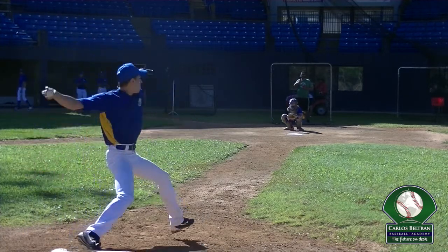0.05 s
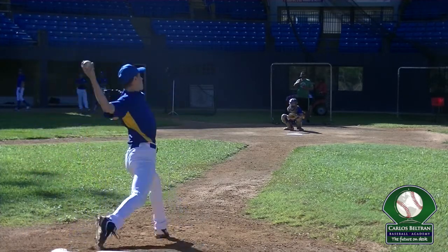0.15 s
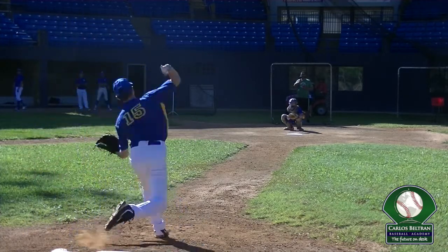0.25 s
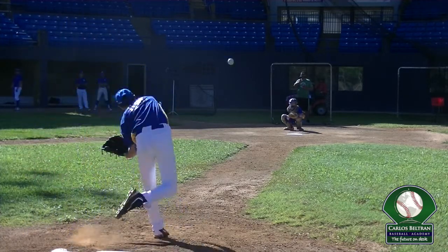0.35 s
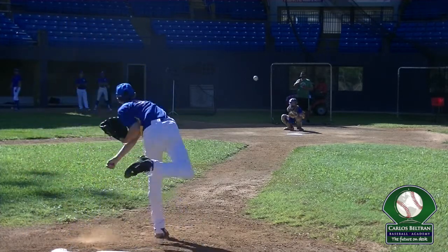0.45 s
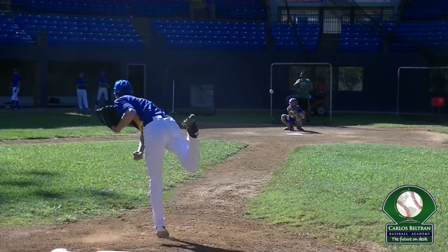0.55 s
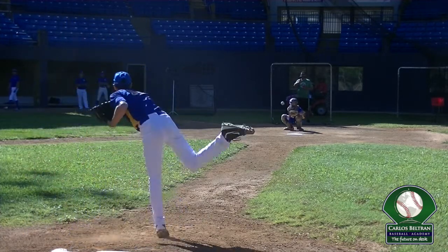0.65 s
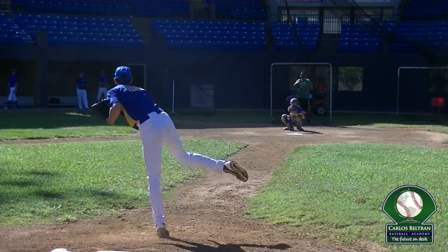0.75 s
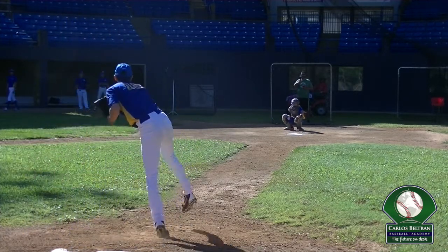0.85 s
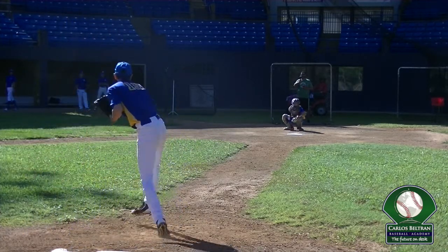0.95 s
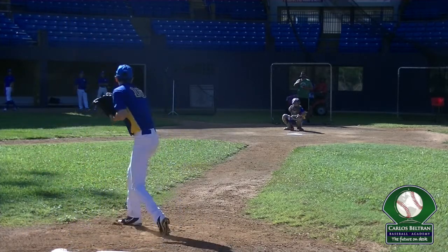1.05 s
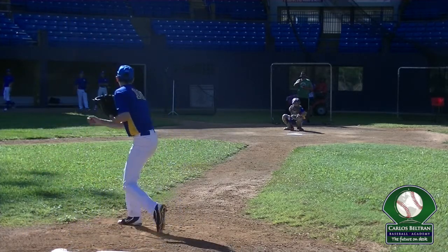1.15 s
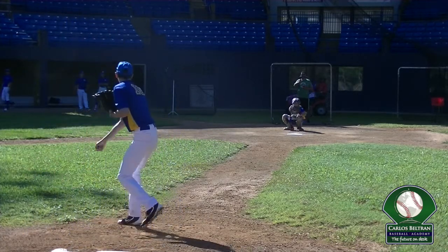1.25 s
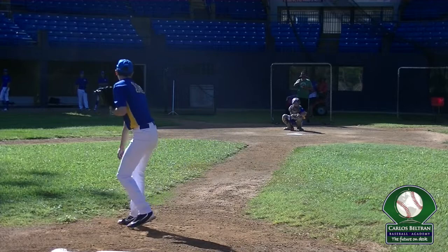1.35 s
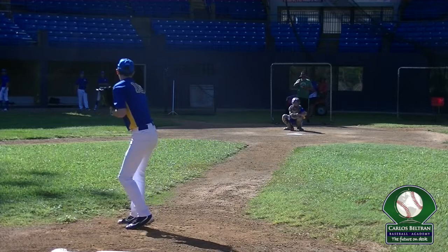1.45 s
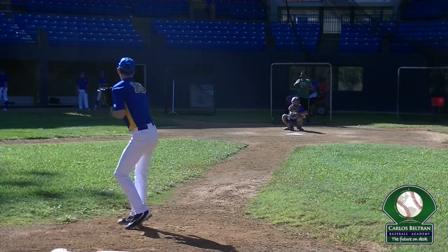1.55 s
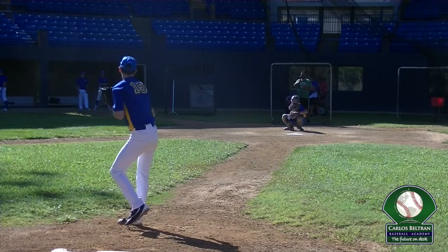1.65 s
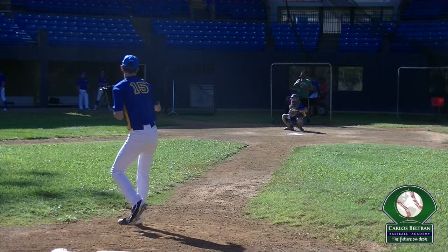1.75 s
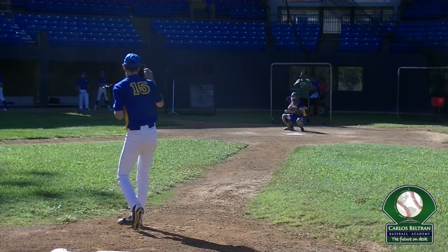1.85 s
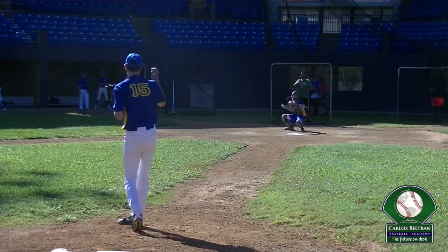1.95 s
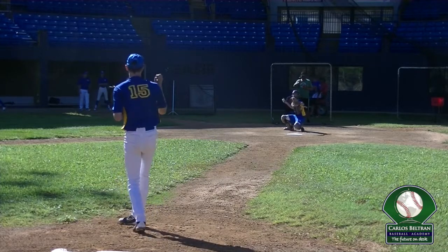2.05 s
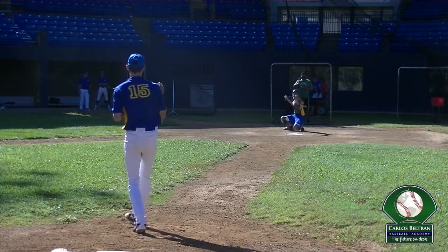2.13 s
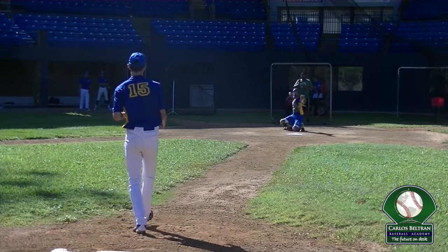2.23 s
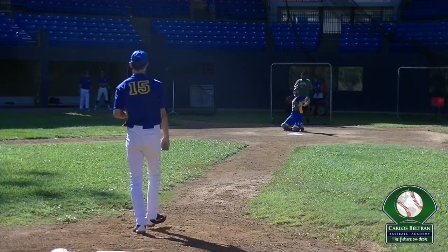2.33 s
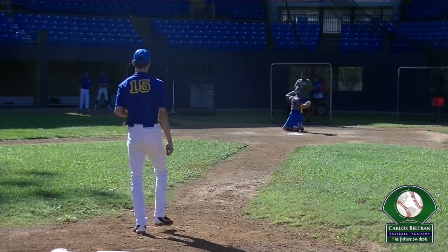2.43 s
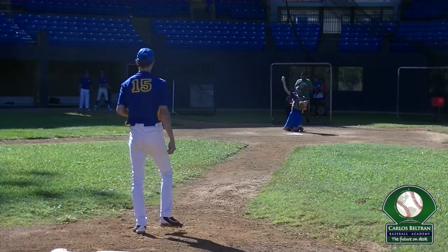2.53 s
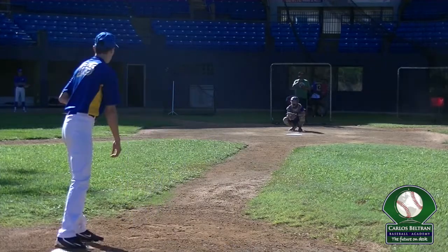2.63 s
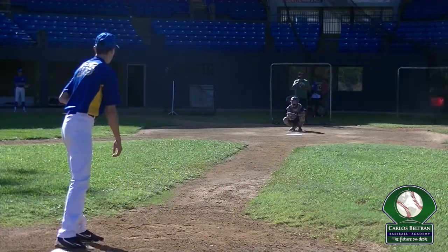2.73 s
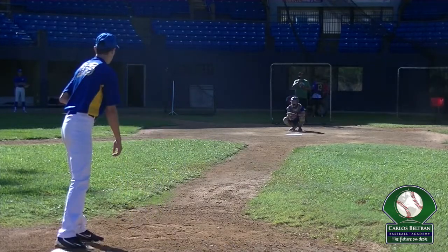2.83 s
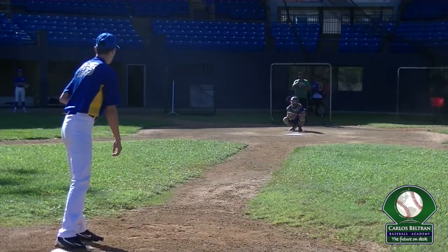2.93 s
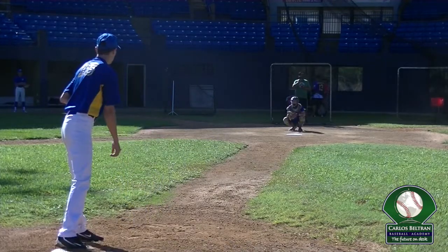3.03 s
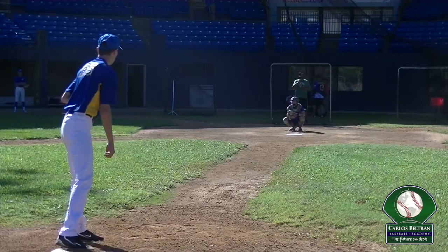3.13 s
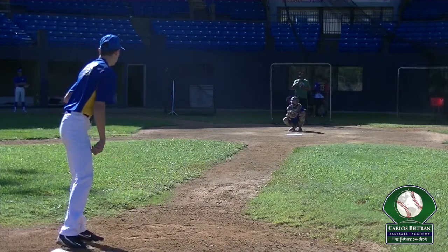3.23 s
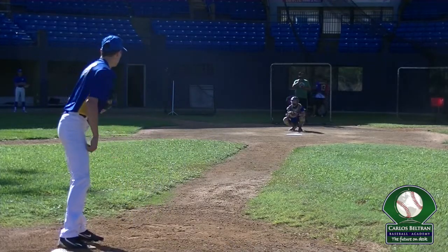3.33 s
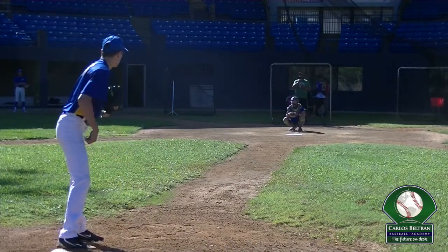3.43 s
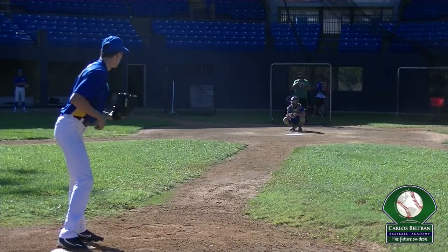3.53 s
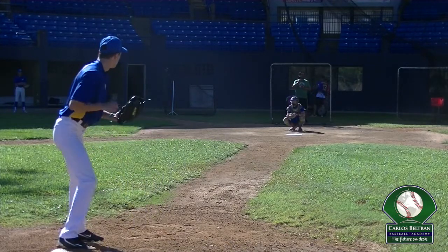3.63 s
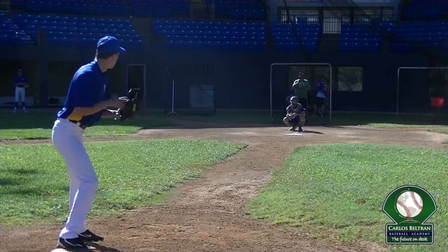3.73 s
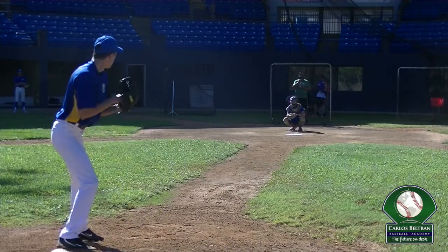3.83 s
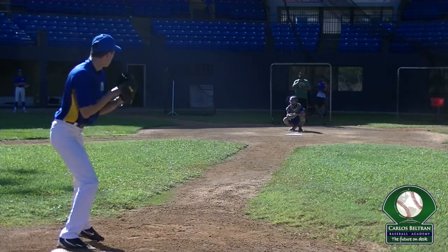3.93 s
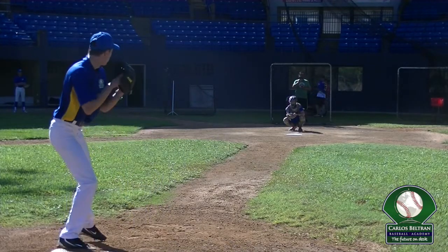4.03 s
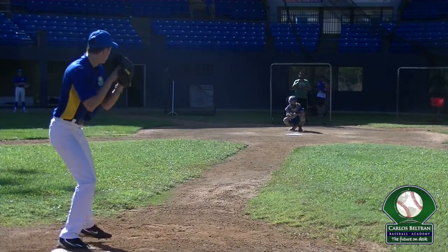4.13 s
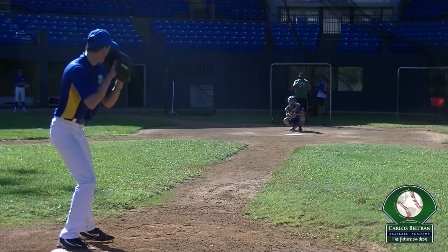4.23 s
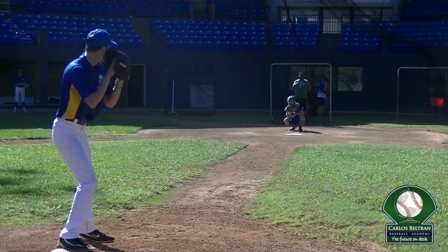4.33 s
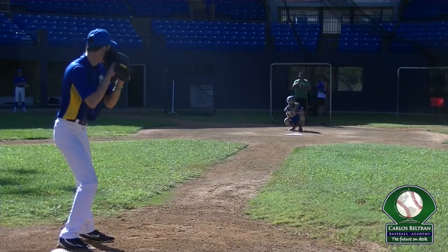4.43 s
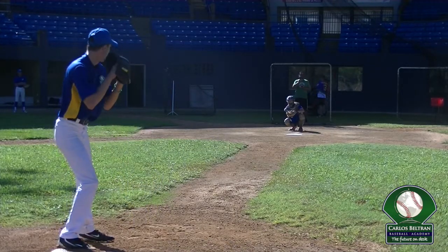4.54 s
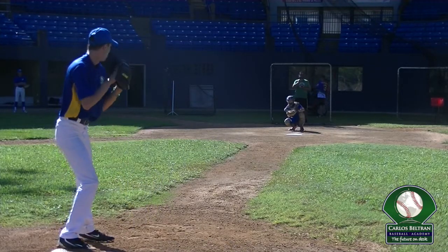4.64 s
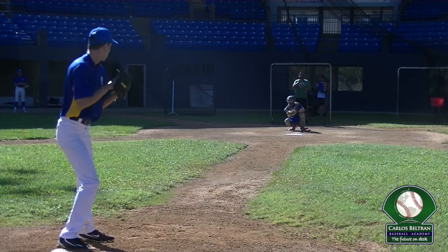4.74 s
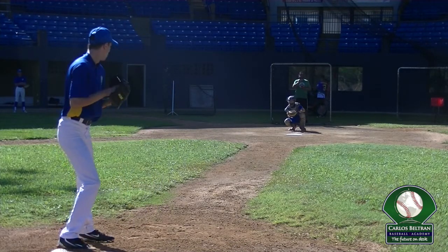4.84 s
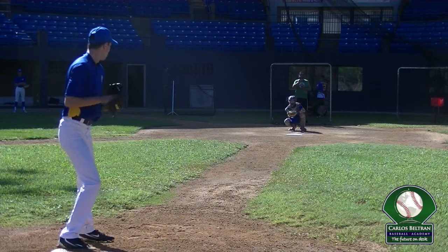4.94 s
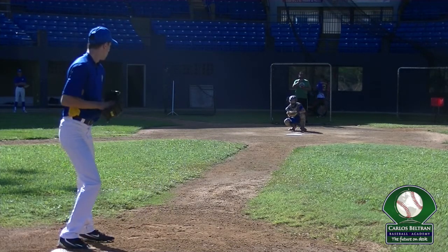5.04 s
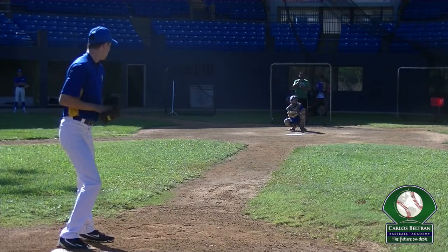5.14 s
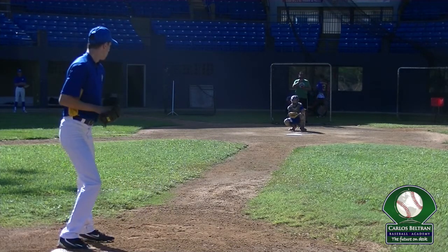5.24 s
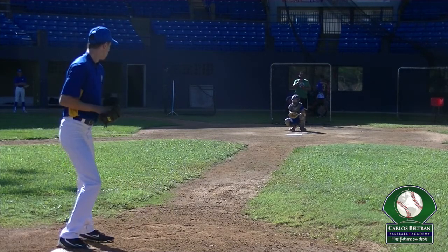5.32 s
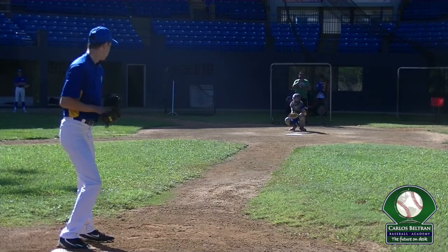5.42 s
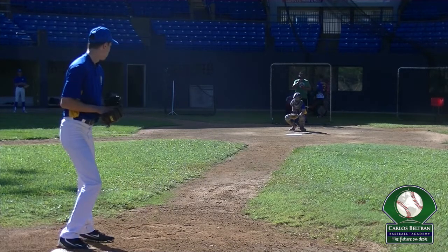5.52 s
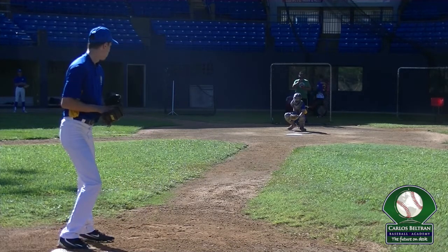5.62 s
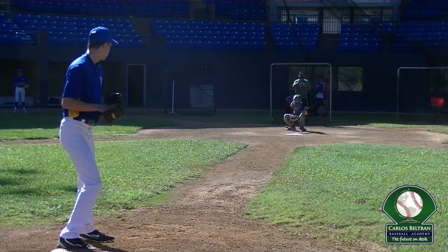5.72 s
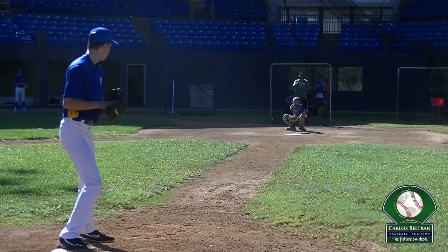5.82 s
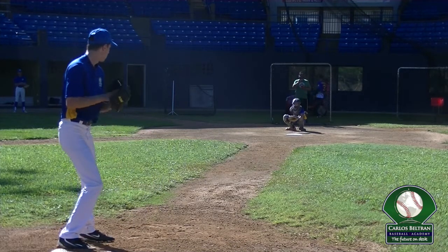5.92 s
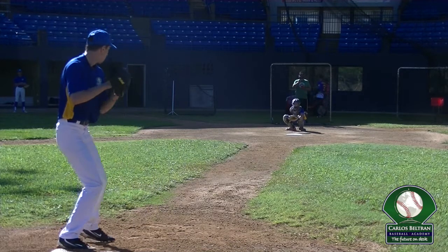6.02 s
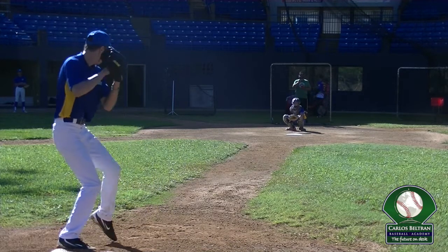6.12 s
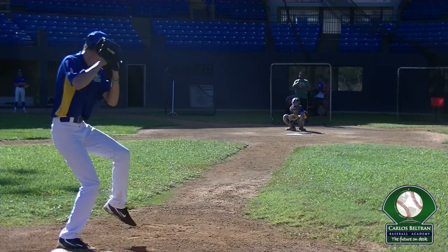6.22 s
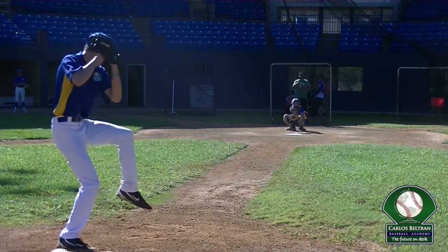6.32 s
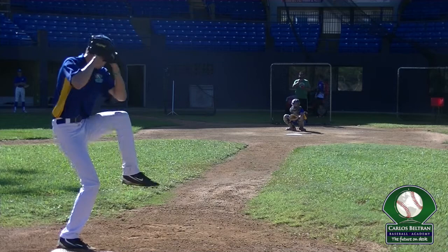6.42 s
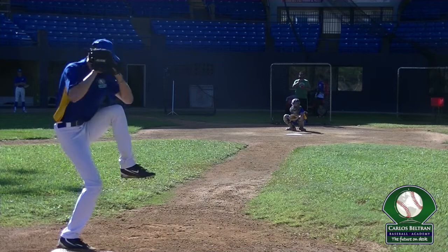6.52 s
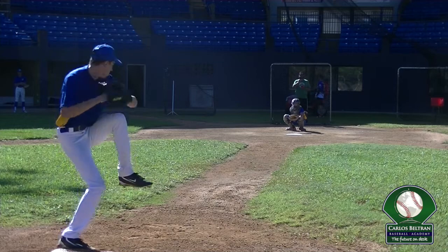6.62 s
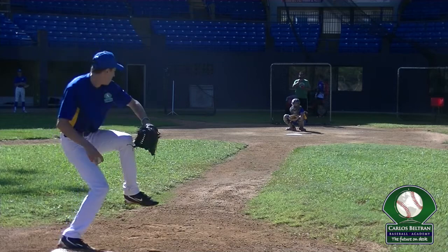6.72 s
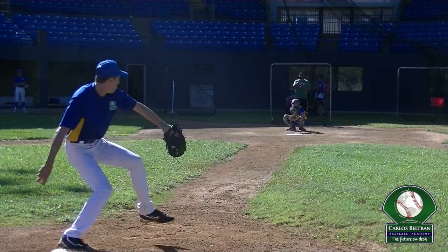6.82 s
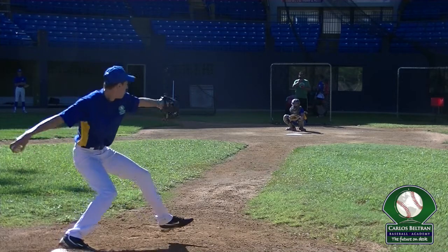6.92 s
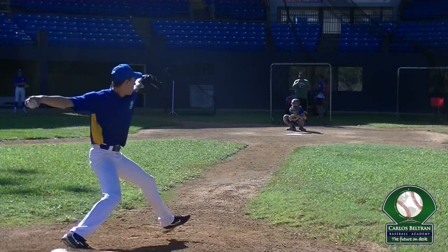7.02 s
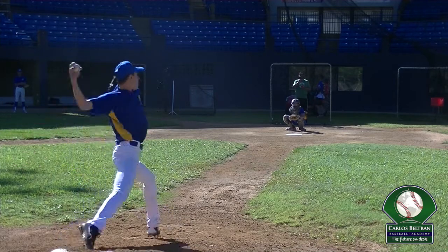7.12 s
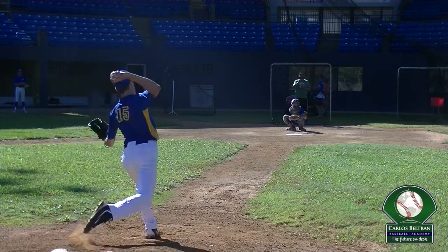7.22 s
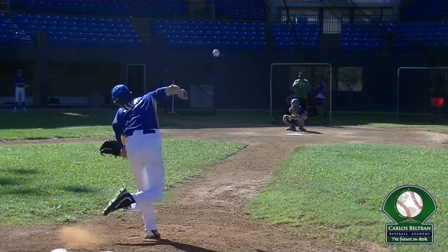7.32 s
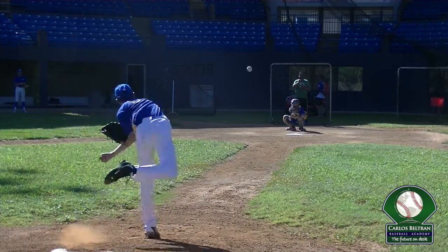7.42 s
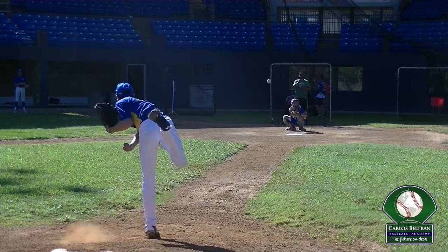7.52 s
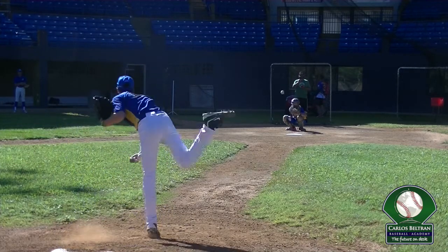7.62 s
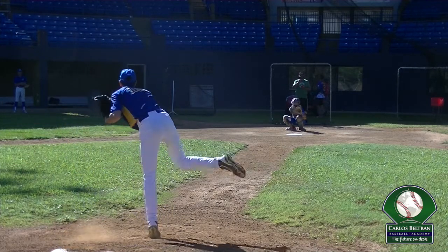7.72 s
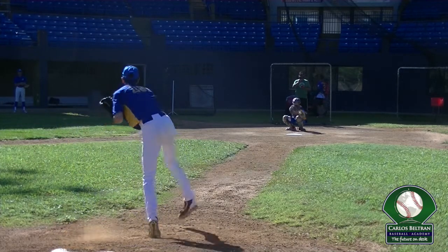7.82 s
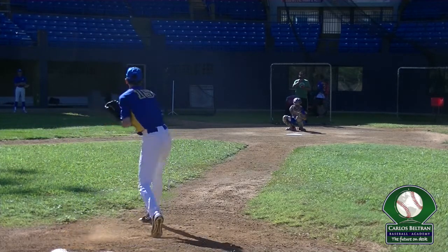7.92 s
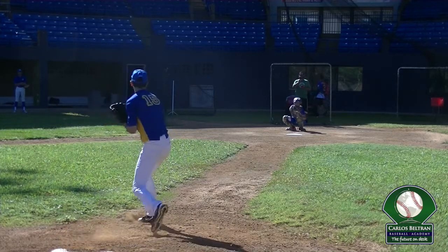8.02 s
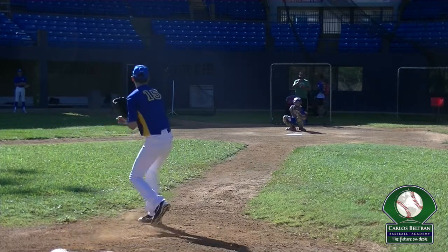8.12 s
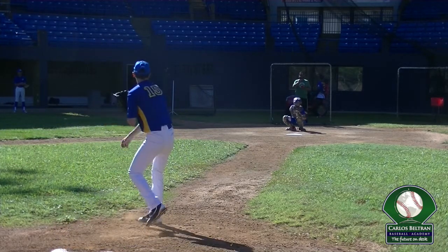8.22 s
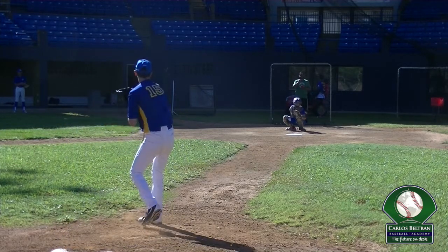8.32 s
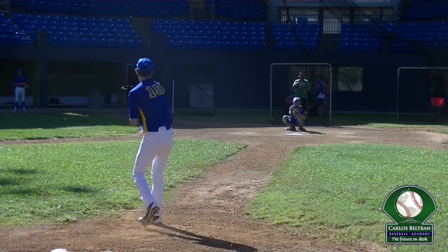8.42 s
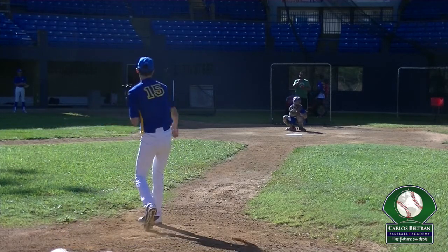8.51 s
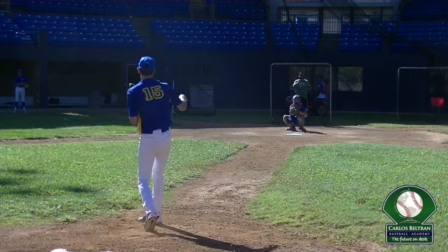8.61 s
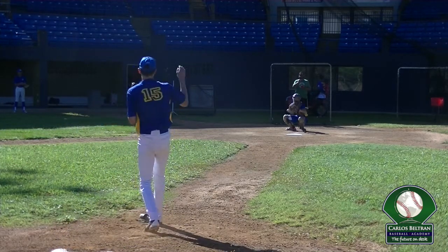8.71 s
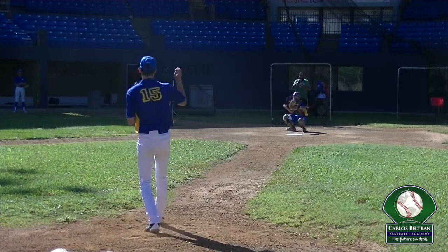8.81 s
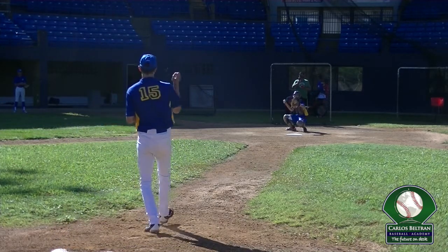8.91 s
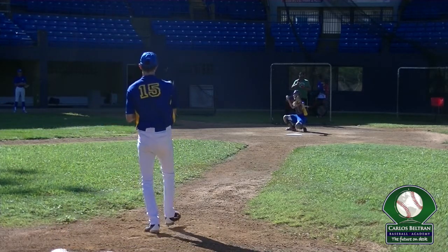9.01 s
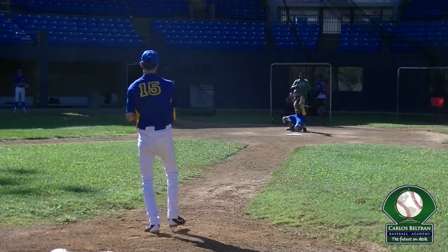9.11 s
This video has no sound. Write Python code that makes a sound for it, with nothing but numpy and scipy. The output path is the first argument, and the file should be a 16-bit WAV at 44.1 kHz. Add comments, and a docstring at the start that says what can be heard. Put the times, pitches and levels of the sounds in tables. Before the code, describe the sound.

Outdoor hush with far traffic, two sharp ball-in-glove pops with slapback echo, buzzy sparrow trills between them, and wind thudding the microphone near the end.

```python
"""A baseball cracks into a leather mitt twice: ringing leather modes over a thump of air in the pocket.
Empty stands throw each crack back as wall echoes and a wash from the seats, both shaped from noise.
Distant traffic and air are random spectra with a faint tone; wind thuds on the microphone as filtered eddies.
Shoes scrape dirt as dense noise grains; sparrows buzz and trill as tones on fast pitch curves.
A gain control ducks after loud peaks."""
import sys
import numpy as np
from scipy import signal
from scipy.fft import rfft
from scipy.io import wavfile
from scipy.ndimage import uniform_filter1d

SR = 44100
rng = np.random.default_rng(int(sys.argv[2]) if len(sys.argv) > 2 else 0)


def put_to_file(sound):
    """Save the sound as 16-bit audio at rate SR, in the file named by the first command-line argument."""
    columns = np.atleast_2d(sound).T  # one column per channel
    safe = np.clip(columns, -1, 1)
    whole_steps = np.round(safe * 32767)
    wavfile.write(sys.argv[1], SR, whole_steps.astype(np.int16))


N = 404000  # length in samples

# Colour of traffic and air: f/Hz, relative level/dB per Hz
AIR_COLOUR = [(25, -59), (105, -27.5), (165, -11.5), (230, -13), (335, -13), (395, -3.5), (450, -4.5),
              (750, -2), (1050, -7.5), (1500, -9.5), (1960, -8.5), (2180, -14.5), (3200, -15), (7000, -31),
              (16000, -43.5)]
# Loudness of traffic and air: t/s, level/dB from 400 to 2500 Hz
AIR_LEVEL = [(0.0, -43), (.95, -43), (1.17, -41.5), (1.5, -42.8), (2.3, -43), (2.93, -41), (7.0, -41.2),
             (7.73, -42.8), (8.85, -42), (9.16, -43.5)]
# Stereo likeness of the air: f/Hz, left-right correlation
AIR_LIKENESS = [(60, 0.64), (150, 0.92), (380, 0.96), (950, 0.87), (2380, 0.73), (5980, 0.31),
                (15000, 0.039)]
# Stereo lean of the air: f/Hz, left minus right/dB
AIR_LEAN = [(60, 2.0), (180, 2.5), (550, 3.3), (1650, 4.6), (4970, 1.4), (15000, 0.82)]
# Faint tone far off, before panning: t/s, level/dB
WHINE_LEVEL = [(0, -59), (2.3, -59), (2.4, -90)]
# Wind strength in three stretches, before the channel gains: t/s, level/dB from 90 to 400 Hz
GUSTS = [
    [(0, -64), (.13, -66), (.17, -46), (.52, -60), (.62, -76), (.74, -55), (.82, -64), (.94, -54)],
    [(1.1, -64), (1.3, -59), (1.48, -50), (1.65, -50), (1.71, -64), (1.87, -58), (2.1, -73)],
    [(6.3, -72), (6.6, -61), (6.8, -71), (6.96, -56), (7.2, -61), (7.32, -51), (7.6, -60), (7.82, -57),
     (7.87, -43), (7.945, -47), (8.0, -48), (8.06, -34), (8.12, -58), (8.42, -48), (8.46, -41), (8.53, -38),
     (8.59, -46), (8.63, -35), (8.66, -42), (8.78, -34), (8.8, -44), (8.86, -38), (8.95, -45), (8.97, -35),
     (9.04, -32), (9.16, -55)],
]
# Colour of wind on the microphone: f/Hz, relative level/dB per Hz
BUFFET_COLOUR = [(15, -82), (25, -43), (115, -7.5), (234, 0.5), (450, -6), (743, -15.5), (1840, -69),
                 (2020, -43), (2500, -55), (3250, -74), (5500, -120)]
# Hardest single eddies, before the channel gains: t/s, peak level/dB
THUDS = [(.076, -40), (0.359, -45), (0.75, -45), (1.355, -41), (1.469, -47), (1.864, -40), (7.867, -34),
         (8.046, -30), (8.241, -37), (8.455, -24), (8.466, -24), (8.503, -23.5), (8.62, -28),
         (8.686, -20.5), (8.726, -24), (8.781, -20.5), (8.8165, -20.5), (8.837, -23), (8.861, -22.5),
         (8.966, -25.5), (9.003, -37), (9.034, -22.5), (9.048, -30), (9.068, -40)]
# The back shoe drags, then the steps land: peak t/s, level/dB from 6.08 to 7.46 kHz,
# swell t/s per 20 dB, fade t/s per 20 dB
SCRAPES = [(.225, -59, .14, .05), (.26, -52, .06, .03), (.382, -58.5, .04, .2), (.6, -68, .5, .8),
           (7.2, -58, .025, .07), (7.25, -54, .12, .018), (7.38, -57, .025, .04), (7.43, -69, .05, .6),
           (7.65, -68, .06, .5)]
# Colour of dirt under the shoes: f/Hz, relative level/dB per Hz
GRIT_COLOUR = [(500, -22), (1100, 1), (1700, 10.5), (2700, 1.5), (4000, -1), (8000, -8), (12000, -17),
               (15500, -38)]
# Small dry tick: t/s, noise level/dB before smoothing and decay
TICKS = [(5.9544, -35)]
# Slaps as the ball runs into the mitt: t/s, level/dB added to each mode, tightness (factor on the upper modes)
SLAPS = [(.9667, -10, 1.2), (.9672, -5, 1.1), (.9681, -11, 1.05), (.9687, 5, .95), (7.9701, -15, 1.3),
         (7.9705, -11, 1.2), (7.9712, -8, 1.33), (7.9718, 4, 1.33)]
# Leather modes: f/Hz before tightness, level/dB relative to the slap, decay t/s to -60 dB
LEATHER_MODES = [(1260, -16.5, 0.0074), (1730, -16, 0.0039), (2520, -3.5, 0.0033), (3490, 4.1, 0.0025),
                 (5700, -10.5, 0.005), (7440, -11, 0.0034), (9130, -8.5, 0.0025)]
# Thumps of air in the pocket: t/s, level/dB before onset and bass cut, f/Hz, decay t/s to -60 dB
POCKET_THUMPS = [(.9678, -11, 495, .027), (7.9706, -11, 435, .024)]
# Screen and ground near the catcher: delay t/s, gain/dB on a short noise burst
NEAR_SURFACES = [(.0015, -41), (.0035, -35), (.006, -42), (0.01, -49), (.024, -42), (0.043, -53),
                 (0.051, -46), (.057, -47), (.075, -68)]
# Each catch as the stands hear it: t/s, level/dB, colour as (f/Hz, relative level/dB per Hz)
CATCHES = [(0.9687, -19.5, [(88, -48), (150, -8), (263, -3.5), (373, -1.5), (462, -3), (1110, -13),
           (1200, -6), (2270, 0), (6600, -7.5), (15500, -32)]), (7.9719, -12.5, [(88, -58), (150, -39.5),
           (189, -26.5), (643, -8), (1570, -22), (2150, -14), (3040, -27), (4310, -25.5), (10300, -39.5),
           (15500, -61)])]
# Walls of the stands: delay t/s, relative level/dB at the first catch, relative level/dB at the second
WALLS = [(.088, -18, -11), (0.0965, -15, -18), (0.1006, 1, 0.9), (0.1056, 1.5, -7), (0.157, -27, -24),
         (.162, -26, -10), (.178, -9, -19), (0.188, -25, -25), (.2, -25, -14)]
# Rows of seats scattering the crack: delay t/s, relative level/dB
SEATS = [(.012, -27), (.086, -27), (.09, -11), (.105, -11.5), (.12, -14.5), (.145, -22.5), (.175, -16),
         (.195, -20.5), (.225, -29.5), (.3, -32), (.6, -60)]
# Longer sparrow notes: start t/s, length t/s, level/dB at the top, fade/dB after it, top f/Hz,
# scoop up from f/Hz below, scoop t/s, final sag f/Hz (negative climbs), full buzz depth f/Hz,
# octave level/dB relative to the tone
BUZZES = [(3.18, .035, -47, -7, 5250, 1000, .02, 50, 300, -21),
          (3.23, .15, -51, -2, 4670, 10, .01, 320, 430, -19),
          (3.532, .024, -48, -9, 4400, 400, .013, 50, 500, -25),
          (3.762, .078, -45, -7, 4980, 800, .016, 400, 450, -24),
          (3.92, .065, -52, -3, 4530, 280, .035, 200, 170, -34),
          (3.985, .055, -50, 0, 4330, 10, .01, 110, 130, -34),
          (4.294, .033, -39, -18, 5000, 1200, .014, 10, 300, -33),
          (4.948, .135, -50, -9, 5090, 190, .06, 150, 500, -20),
          (5.07, .15, -61, -4, 5040, 10, .01, 80, 520, -20),
          (5.328, .042, -42, -20, 4750, 650, .018, 130, 100, -30),
          (5.465, .1, -44, -12, 4810, 410, .05, 310, 240, -30),
          (6.092, .033, -53, -1, 4500, 410, .013, 30, 400, -25),
          (6.532, .058, -42, -13, 4800, 500, .016, 220, 90, -19),
          (6.595, .07, -45, -6, 5090, 390, .025, 450, 380, -17.5),
          (6.665, .055, -46, 0, 4680, 10, .01, 320, 330, -17.5),
          (6.715, .04, -42, -8, 4840, 480, .02, 140, 160, -17.5),
          (6.85, .08, -47, -6, 4650, 200, .01, 230, 350, -18),
          (6.955, .055, -44, -18, 4700, 600, .022, -40, 90, -24),
          (7.097, .103, -36, -5, 4830, 950, .052, 500, 170, -35),
          (7.53, .058, -40.5, -6, 4900, 430, .025, 230, 330, -24),
          (7.66, .11, -52, -3, 4480, 10, .03, -220, 400, -18),
          (7.835, .055, -44, -13, 4780, 650, .022, 140, 110, -24),
          (7.985, .083, -48, 1, 4720, 470, .04, 170, 170, -27),
          (8.305, .045, -47, -6, 4520, 40, .006, -50, 280, -19.5),
          (8.345, .29, -54, -4, 4720, 300, .035, 330, 400, -19.5)]
# Evenly spaced rising notes: first t/s, last t/s, notes, first level/dB, last level/dB,
# first f/Hz, last f/Hz, rise f/Hz; each note varies its rise and starts 5 ms before its time
TRILLS = [(3.2652, 3.297, 2, -50, -46, 4380, 3920, 1300), (3.4083, 3.4466, 2, -44, -47, 4010, 3980, 1300),
          (3.5843, 3.6446, 3, -49, -44, 3850, 3380, 1300), (3.8038, 3.8921, 3, -47, -49, 3470, 3480, 1300),
          (4.0617, 4.171, 4, -47, -46, 4250, 4250, 600), (4.348, 4.412, 3, -41, -39, 4200, 4000, 1200),
          (4.5565, 4.6578, 4, -42, -45, 4260, 4050, 1000), (4.7232, 4.788, 3, -47, -48, 4020, 3810, 1000),
          (4.861, 4.9252, 3, -49, -50, 4000, 3700, 1000), (5.0664, 5.136, 3, -49, -47, 4050, 4050, 1300),
          (5.3976, 5.432, 2, -47, -43, 4000, 3940, 1300), (5.4544, 5.4864, 2, -44, -44, 3570, 4500, 1300),
          (5.5907, 5.658, 3, -46, -40, 4030, 4360, 1300), (5.7063, 5.7744, 3, -43, -43, 4040, 4160, 1300),
          (6.143, 6.258, 4, -46, -48, 4290, 4380, 1350), (6.435, 6.5518, 4, -47, -44, 4150, 4150, 1350),
          (6.6944, 6.8034, 7, -43, -41, 4250, 3900, 1600), (6.8344, 6.9426, 4, -40, -47, 3880, 4250, 1600),
          (6.9726, 7.002, 2, -37, -45, 4500, 3970, 1350), (7.233, 7.3026, 3, -41, -38, 4130, 4330, 1400),
          (7.609, 7.722, 4, -35.5, -40, 4360, 4240, 1400), (7.7762, 7.8103, 2, -48, -45, 4060, 4170, 1400),
          (8.148, 8.2024, 3, -41, -49, 4300, 4220, 700), (8.2561, 8.3394, 3, -51, -47, 3900, 3950, 680),
          (8.4093, 8.484, 3, -46, -47, 4000, 3900, 660), (8.5106, 8.5492, 3, -46, -46, 3770, 3830, 650),
          (8.5844, 8.6158, 2, -46, -44, 3860, 3770, 640), (8.668, 8.6946, 2, -46, -49, 3930, 3980, 630),
          (8.7171, 8.7344, 2, -43, -48, 3850, 3700, 630), (8.759, 8.778, 2, -48, -43, 3700, 3800, 630),
          (8.844, 8.987, 4, -41, -42, 3810, 3870, 610)]


def amp(db):
    """Decibels to gain."""
    return 10 ** (np.asarray(db) / 20)


def read(points, hz):
    """Value of a spectrum table at hz."""
    f, value = np.transpose(points)
    return np.interp(np.log(hz + 1), np.log(f + 1), value)


def add(mix, s, sound):
    """Mixes a sound in at s seconds."""
    part = mix[round(s * SR):][:len(sound)]
    part += sound[:len(part)]


def evened(x, lo_hz=0, hi_hz=SR):
    """Scales x to rms 1 within a band."""
    spectrum, hz = rfft(x), np.fft.rfftfreq(x.shape[-1], 1 / SR)
    inside = spectrum[..., (hz >= lo_hz) & (hz <= hi_hz)]
    energy = 2 * np.sum(abs(inside) ** 2)
    return x * x.shape[-1] / np.sqrt(energy * x.shape[-1] / x.size + 1e-20)


def coloured(x, points):
    """Causal minimum-phase filter of energy 1 with the given spectrum."""
    hz = abs(np.fft.fftfreq(4096, 1 / SR))
    log_gain = np.log(amp(np.maximum(read(points, hz), -100)))
    taps = np.fft.ifft(np.exp(np.conj(signal.hilbert(log_gain)))).real[:2048]
    taps /= np.linalg.norm(taps)
    return signal.oaconvolve(np.atleast_2d(x), taps[None], axes=1)[:, :x.shape[-1]]


def envelope(tables):
    """Gain over the whole scene from (t/s, level/dB) tables, silent outside each."""
    t = np.arange(N) / SR
    gain = sum(amp(np.interp(t, *np.transpose(rows), -200, -200)) for rows in tables)
    return uniform_filter1d(gain, 200)


def swells(rows):
    """Gain over the whole scene from events that swell to a peak and fade."""
    t = np.arange(N) / SR
    gain = sum(amp(db - 20 * np.maximum((s - t) / rise_s, (t - s) / fade_s))
               for s, db, rise_s, fade_s in rows)
    return uniform_filter1d(gain, size=200)


def wander(hz, shape):
    """Smooth random motion of rms 1, low-passed at hz."""
    return evened(signal.lfilter(*signal.butter(2, hz, fs=SR), rng.standard_normal(shape)))


def air():
    """Random short-time spectra with drifting patches, partly alike in both channels, and a faint wavering tone."""
    whine_hz, patch_db = 1257, 0.77
    frames, hz = N // 256 + 5, np.fft.rfftfreq(1024, 1 / SR)
    real, imag, other_real, other_imag, patches = rng.standard_normal((frames, 513, 5)).T
    patches = uniform_filter1d(uniform_filter1d(patches, 12, 0), 16, 1)
    same = np.clip(read(AIR_LIKENESS, hz), -1, 1)[:, None]
    lean = read(AIR_LEAN, hz)[:, None] / 2  # half up on the left, half down on the right
    left = real + 1j * imag
    right = same * left + np.sqrt(1 - same ** 2) * (other_real + 1j * other_imag)
    spectra = np.array([left * amp(lean), right * amp(-lean)])
    spectra *= amp(read(AIR_COLOUR, hz)[:, None] + patch_db * patches / patches.std())
    wash = signal.istft(spectra, nperseg=1024, noverlap=768)[1][:, :N]
    wash = evened(wash, 400, 2500)
    turn = 2 * np.pi * np.cumsum(whine_hz + 3 * wander(3, N)) / SR
    tone = np.sqrt(2) * np.sin(turn) * envelope([WHINE_LEVEL])
    return wash * envelope([AIR_LEVEL]) + tone * amp([[2.5], [-2.5]])


def wind():
    """Eddies thud on one microphone port: loud on the left, weaker and reversed on the right."""
    eddies_per_s, spread_db, lumps_db = 200., 3.5, 2.5
    size = amp(spread_db * np.minimum(rng.exponential(1, N), 3)) * rng.choice([-1., 1.], N)
    eddies = evened(size * (rng.random(N) < eddies_per_s / SR))
    eddies += 0.66 * rng.standard_normal(N)  # smooth rush between the eddies
    lumpy = eddies * amp(lumps_db * wander(38.0, N))
    thuds = evened(coloured(lumpy, BUFFET_COLOUR)[0], 90, 400) * envelope(GUSTS)
    thud = np.diff(coloured(np.eye(1, 2048)[0], BUFFET_COLOUR)[0])  # sharper than the common eddy
    for s, db in THUDS:
        add(thuds, s, amp(db) * thud / abs(thud).max())
    return thuds * np.array([[amp(9.5)], [-amp(1.0)]])


def shoes():
    """Dense random grains of grit swell as shoes scrape; the tick is a burst of decaying noise."""
    grains_per_s, spread_db = 2500., 2.5
    size = amp(spread_db * rng.exponential(1, N)) * rng.standard_normal(N)
    grains = size * (rng.random(N) < grains_per_s / SR)
    both = evened(grains) + 0.99 * rng.standard_normal(N)
    each = 0.27 * rng.standard_normal((2, N))
    out = evened(coloured(both + each, GRIT_COLOUR), 6080, 7460) * swells(SCRAPES)
    t = np.arange(200) / SR
    for s, db in TICKS:
        burst = amp(db - 60 * t / .004) * rng.standard_normal(len(t))
        add(out.T, s, uniform_filter1d(burst, size=3)[:, None])
    return out


def mitt():
    """Each slap rings the leather briefly, the pocket thumps, and nearby surfaces return thin copies."""
    out, t = np.zeros(N), np.arange(2000) / SR
    for s, db, tight in SLAPS:
        ring = np.zeros(len(t))
        for hz, mode_db, t60 in LEATHER_MODES:
            # tightness tunes only the modes of the stretched palm, above 3 kHz
            tuned_hz = hz * (tight if hz > 3000 else 1)
            ring += amp(db + mode_db - 60 * t / t60) * np.sin(2 * np.pi * tuned_hz * t)
        add(out, s, -ring * (1 - np.exp(-t / .00012)))
    for s, db, hz, t60 in POCKET_THUMPS:
        thump = amp(db - 60 * t / t60) * np.sin(2 * np.pi * hz * t)
        add(out, s, thump * (1 - np.exp(-t / 0.00061)))
    out = signal.lfilter(*signal.butter(1, 170, "high", fs=SR), out)  # a small source radiates little bass
    taps = np.zeros((2, SR // 10))
    for s, db in NEAR_SURFACES:
        burst = rng.standard_normal((41, 2)) + rng.standard_normal((41, 1))
        add(taps.T, s, amp(db) * np.diff(burst, axis=0))
    copies = signal.oaconvolve(out[None], taps, axes=1)[:, :N]
    return out * amp([[.4], [-.4]]) + copies


def stands():
    """Walls return short smeared copies of the crack; the seats return a dense wash of it, duller with distance."""
    smear_s, apart, dull_hz = .0015, .35, 4500.  # apart: share of noise that differs left and right
    out, t = np.zeros((2, N)), np.arange(int(.6 * SR)) / SR
    seats = amp(np.interp(t, *np.transpose(SEATS), -200, -200))
    far = np.clip((t - .11) / 0.067, 0, 1)  # late returns cross over to the dull version
    for k, (s, db, colour) in enumerate(CATCHES):
        walls = sum(amp(row[1 + k]) * np.exp(-((t - row[0]) / smear_s) ** 2) for row in WALLS)
        both, *each = rng.standard_normal((3, len(t)))
        returns = np.hypot(walls, seats) * (both + apart * np.array(each))
        echo = amp(db) * coloured(returns, colour)
        dull = signal.lfilter(*signal.butter(1, dull_hz, fs=SR), echo)
        echo += far * (dull - echo)
        add(out.T, s, echo.T * amp([1.2, -1.2]))
    return out


def whistle(hz, overtone_db):
    """A bird's tone on a pitch curve, with a weak octave."""
    turn = 2 * np.pi * np.cumsum(hz) / SR
    return np.sqrt(2) * (np.sin(turn) + amp(overtone_db) * np.sin(2 * turn))


def buzzes():
    """Longer notes scoop up and sag while their pitch and level slur about two hundred times a second."""
    buzz_hz, rough = 200., .2
    grows_s, grows_from = .025, .6  # the buzz deepens from this share
    scoop_db = -5  # the scoop starts this far under the top level
    out = np.zeros(N)
    for s, length, top_db, fade_db, top_hz, scoop_hz, scoop_s, sag_hz, deep_hz, octave_db in BUZZES:
        t = np.arange(0, length, 1 / SR)
        db = top_db + np.interp(t, (0, scoop_s, length), (scoop_db, 0, fade_db))
        scoop = scoop_hz * (1 - t / scoop_s) ** 2
        sag = sag_hz * (abs(t - scoop_s) / (length - scoop_s)) ** 2
        hz = top_hz - np.where(t < scoop_s, scoop, sag)
        depth = deep_hz * np.interp(t, (0, grows_s), (grows_from, 1))
        slur = 2 * np.pi * np.cumsum(buzz_hz * (1 + 0.118 * wander(67.0, len(t)))) / SR
        pitch = hz + depth * (np.cos(slur) + rough * wander(300., len(t)))
        throb = 1 + np.minimum(depth / 300, .8) * np.sin(slur)
        fades = signal.windows.tukey(len(t), .22)
        add(out, s, amp(db) * whistle(pitch, octave_db) * throb * fades)
    return out


def trills():
    """Each trill is a run of single quick rises, each slightly different in pitch and swell."""
    note_s = .018
    out, u = np.zeros(N), np.linspace(0, 1, int(note_s * SR))
    notes = []
    for s0, s1, count, db0, db1, hz0, hz1, rise_hz in TRILLS:
        notes.extend(np.linspace((s0, db0, hz0, rise_hz), (s1, db1, hz1, rise_hz), round(count)))
    variations = rng.uniform((.8, -1, 0), (1.2, 1, 6), (len(notes), 3))
    for (s, db, hz, rise_hz), (stretch, wobble, beat) in zip(notes, variations):
        pitch = hz + stretch * rise_hz * (u ** 1.31 - .27) + 90 * wobble * np.sin(9 * u)
        swell = np.sin(np.pi * u ** 0.62) ** 2 * (1 + .5 * np.sin(14 * u + beat))  # uneven, thin at the top
        add(out, s - .005, amp(db) * whistle(pitch, -29.0) * swell)
    return out


def sparrows():
    """Buzzes and trills ring on in a noise tail with a fast and a slow decay."""
    out, t = buzzes() + trills(), np.arange(SR // 2) / SR
    both, *each = rng.standard_normal((3, len(t)))
    decay = amp(-60 * t / 0.17) + amp(-8 - 60 * t / 1.17)  # the eaves, then the stands
    tail = (both + .5 * np.array(each)) * decay
    tail /= np.linalg.norm(tail[0])
    return out + amp(-3) * signal.oaconvolve(out[None], tail, axes=1)[:, :N]


def scene():
    """All sources at the two microphones."""
    return air() + wind() + shoes() + mitt() + stands() + sparrows()


def record(dry):
    """Gain control drops just after loud peaks and climbs back; the converter clips; then bass cut and band limit."""
    recovery_db_per_s, threshold_db, edge_hz = 100.0, -23, 15800
    power = signal.lfilter(np.ones(256) / 256, 1, (dry ** 2).mean(0))
    power_db = 10 * np.log10(power + 1e-12)
    climb = np.arange(N) * recovery_db_per_s / SR
    held_db = np.maximum.accumulate(power_db + climb) - climb
    over_db = np.maximum(held_db - threshold_db, 0)
    duck_db = signal.lfilter([.006], [1, .006 - 1], .5 * over_db)  # half the excess, lagging by a few ms
    clipped = np.clip(dry / amp(duck_db), -1, 1)
    lean = signal.lfilter(*signal.butter(1, 30, "high", fs=SR), clipped)
    band_limit = signal.firwin(1023, edge_hz, window=("kaiser", 9), fs=SR)
    return np.clip(signal.oaconvolve(lean, band_limit[None], "same"), -1, 1)


dry = scene()
out = record(dry)
put_to_file(out)
```